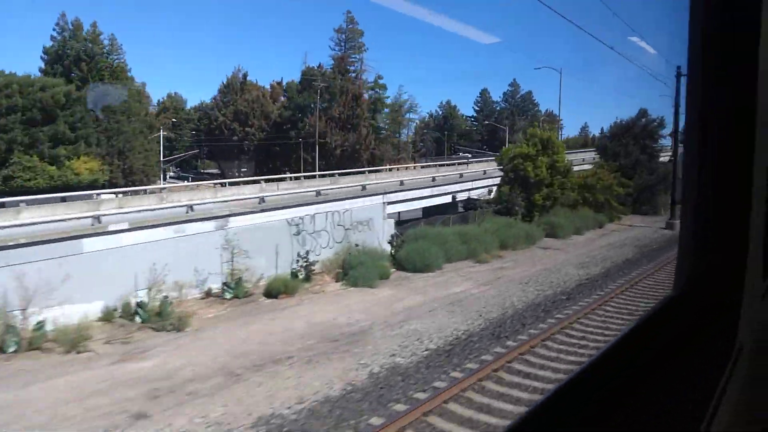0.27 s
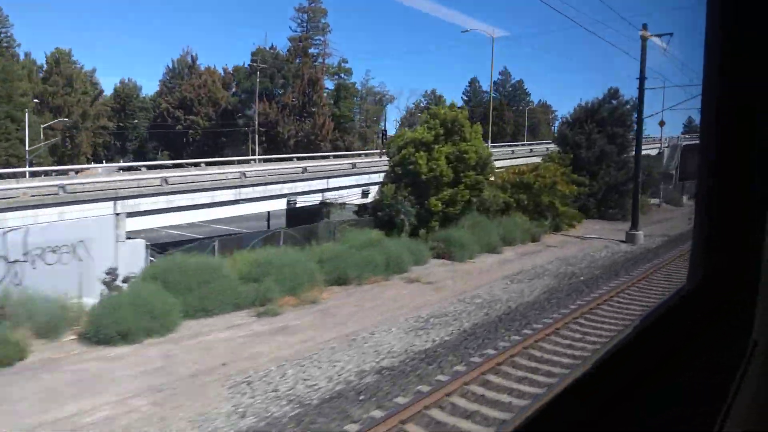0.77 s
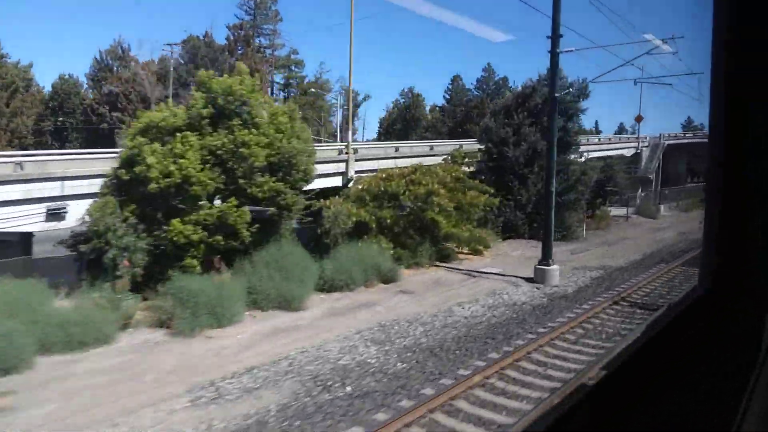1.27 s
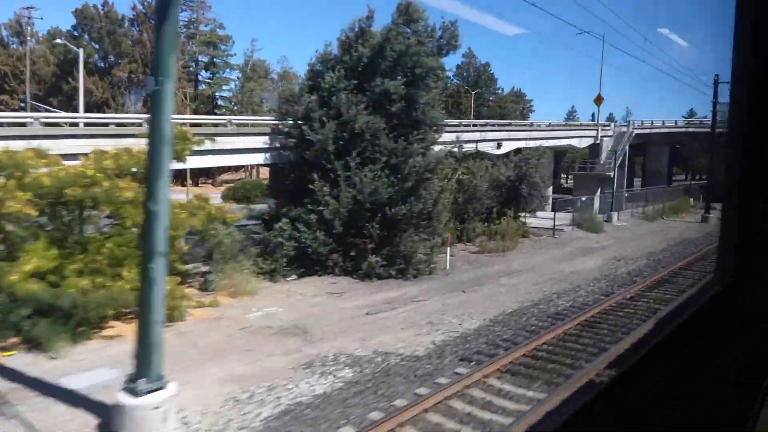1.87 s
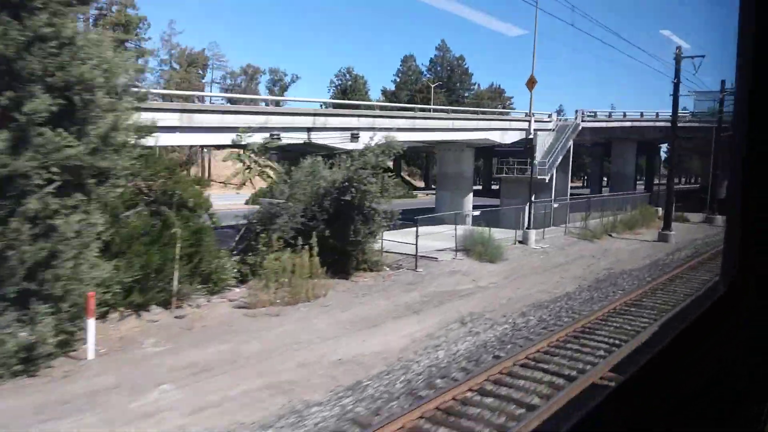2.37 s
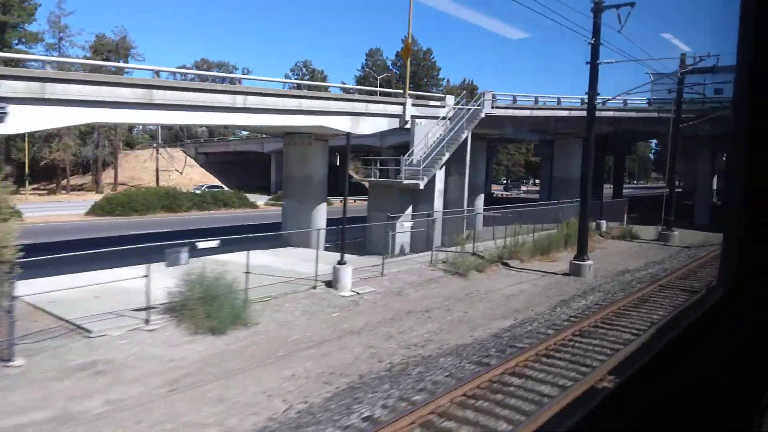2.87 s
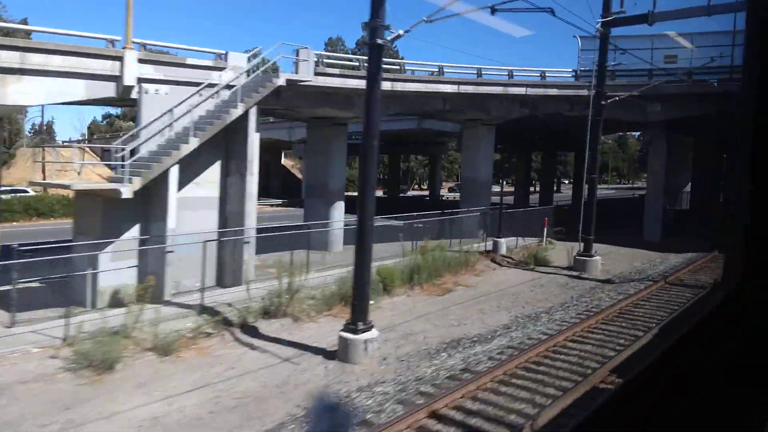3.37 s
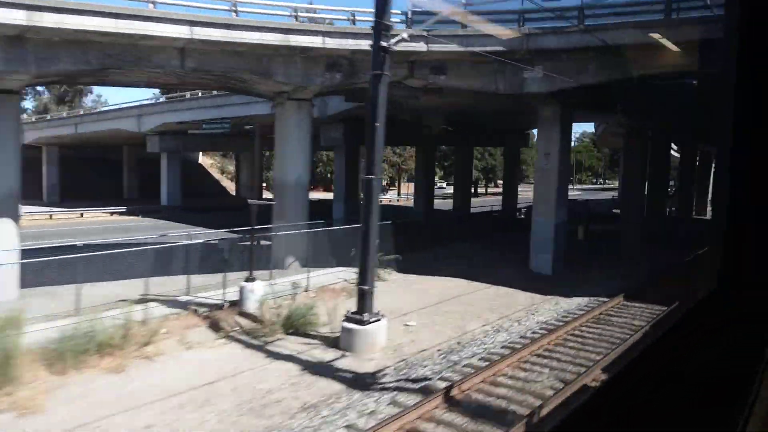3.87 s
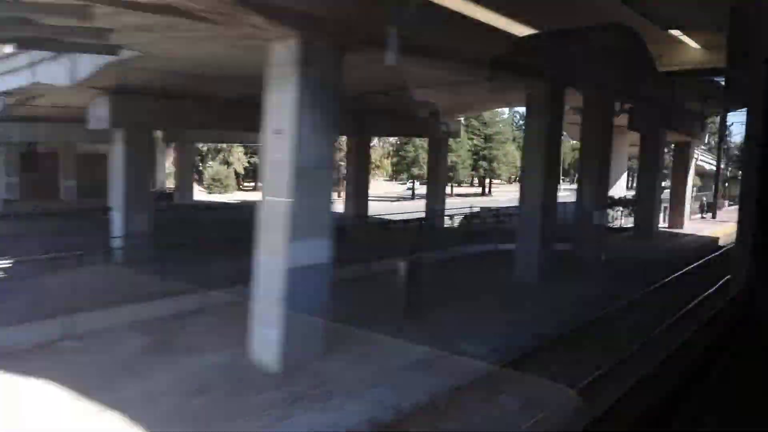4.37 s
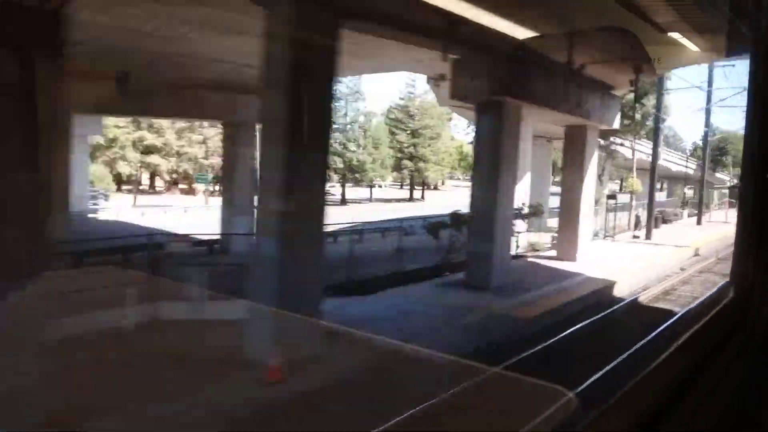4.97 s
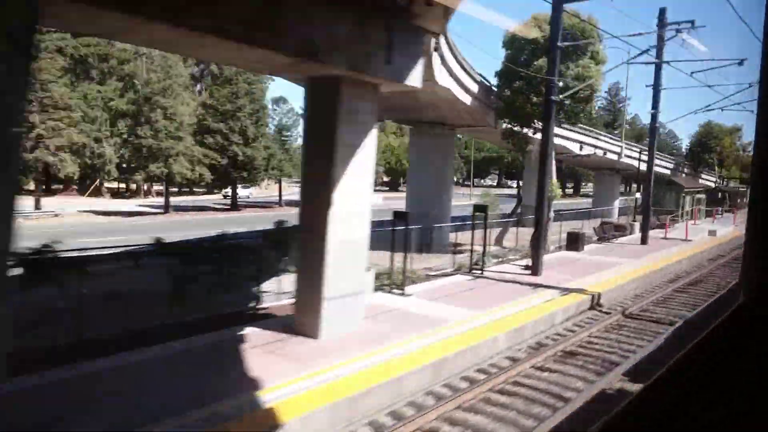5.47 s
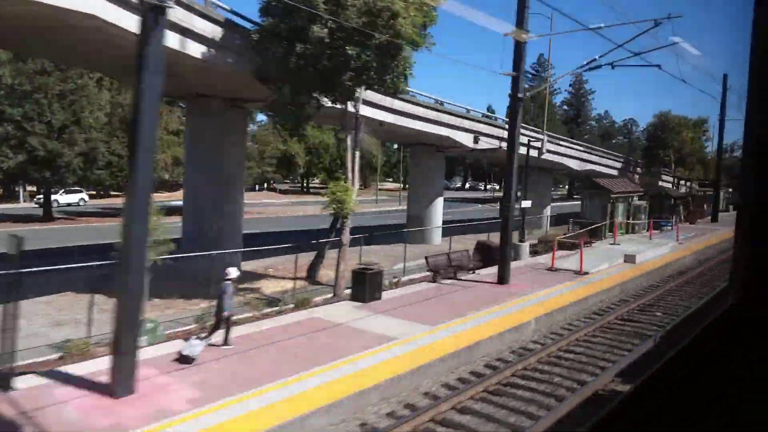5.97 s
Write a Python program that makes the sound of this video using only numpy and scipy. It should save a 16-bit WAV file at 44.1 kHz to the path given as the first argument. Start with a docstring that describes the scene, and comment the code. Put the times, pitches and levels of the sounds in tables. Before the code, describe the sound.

A stereo microphone in a closed train carriage picks up continuous bassy rolling, body thumps without sharp clacks, low hum and gentle air hiss. Faint high tones swell and fade unevenly, mostly toward the left. Around the middle come a few tiny dry ticks and light rustling, later one more soft tick. In the second half a low, hollow echo swells as the train passes under a bridge and along a platform.

```python
"""Inside an electric train by a window

Rough rail and dips in the track drive body, bogie and floor: bands of noise shaken into a deep rumble.
Diffuse noise gives the panel drone, the wheel roar and the echo that swells under a road bridge.
Vents hiss as shaped noise and fans hum as wandering sines; a power converter whines faintly as
high tones that waver at each side. Soft ticks and longer, faint rustles nearby are bursts of bright,
chattering noise."""
import sys
import numpy as np
from scipy import signal
from scipy.fft import rfft, irfft, next_fast_len
from scipy.io import wavfile
from scipy.ndimage import uniform_filter1d, map_coordinates

SR = 44100
rng = np.random.default_rng(int(sys.argv[2]) if len(sys.argv) > 2 else 0)


def put_to_file(sound):
    """Save the sound as 16-bit audio at rate SR, in the file named by the first command-line argument."""
    columns = np.atleast_2d(sound).T  # one column per channel
    safe = np.clip(columns, -1, 1)
    whole_steps = np.round(safe * 32767)
    wavfile.write(sys.argv[1], SR, whole_steps.astype(np.int16))


N = 274743  # samples


def amp(db):
    """Logarithmic level: decibels become an amplitude gain."""
    return 10 ** (np.asarray(db) / 20)


def unit(x):
    """Normalisation: scale the whole signal to rms 1."""
    return x / np.sqrt(np.mean(x ** 2) + 1e-20)


def along(points, hz):
    """Logarithmic interpolation: (frequency, value) points read on a log frequency axis."""
    point_hz, values = np.transpose(points)
    return np.interp(np.log(hz + 1), np.log(point_hz + 1), values)


def curves(rows):
    """Linear interpolation: one value per sample for each column after the time."""
    times, *columns = np.transpose(rows)
    return [np.interp(np.arange(N) / SR, times, column) for column in columns]


def wobble(rate):
    """Random modulation: a smooth curve through normal random knots, rate knots a second."""
    knots = rng.standard_normal(int(N * rate / SR) + 4)
    return map_coordinates(knots, [np.arange(N) * rate / SR])


def filtered(x, response):
    """Linear filtering: the spectrum of x times a response of frequency."""
    size = next_fast_len(N + SR // 2)
    spectrum = rfft(x, size) * response(np.fft.rfftfreq(size, 1 / SR))
    return irfft(spectrum, size)[..., :N]


def noise(response, channels=1):
    """Spectral shaping: white noise filtered so its amplitude per root Hz is the response."""
    return filtered(rng.standard_normal((channels, N)) * np.sqrt(SR / 2), response)


def resonance(hz, centre, width):
    """Damped oscillator: a complex bandpass response with gain 1 at its centre."""
    return 1j * hz * width / (centre ** 2 - hz ** 2 + 1j * hz * width)


def panned(lean_db):
    """Level difference between the sides: left and right gains of mean power 1."""
    gains = np.vstack([amp(lean_db / 2), amp(-lean_db / 2)])
    return gains / np.sqrt(np.mean(gains ** 2, axis=0))


def steadied(x, seconds):
    """Power levelling: rms 1 over each stretch of this length; the faster flutter stays."""
    power = uniform_filter1d(np.mean(x ** 2, axis=0), int(seconds * SR))
    return x / np.sqrt(np.abs(power) + 1e-20)


def tone(hz, wander_hz):
    """Frequency modulation: a sine of rms 1 whose pitch wanders at random."""
    cycles = np.cumsum(hz + wander_hz * wobble(10)) / SR + rng.random()
    return np.sqrt(2) * np.sin(2 * np.pi * cycles)


# dips in the track that jolt the car:
# (time [s], body sway level [dB], bogie throb level [dB], floor boom level [dB])
JOLTS = [(0.47, -27, -26.5, -36), (0.57, -23.5, -27, -42), (0.65, -15.5, -35, -31.5), (0.79, -40, -24, -44),
         (0.92, -30, -27, -28), (1.11, -29, -28, -41), (1.25, -32, -28.5, -29), (1.45, -34, -38, -28.5),
         (1.56, -23, -21.5, -41), (1.71, -20.5, -23, -27), (1.80, -40, -28.5, -32), (2.26, -18, -28, -29.5),
         (2.42, -12.5, -43, -39), (2.52, -18, -42, -31.5), (2.65, -20, -40, -31.5), (2.85, -26, -38, -27.5),
         (3.06, -16.5, -40, -42), (3.25, -22.5, -43, -47), (3.46, -21.5, -31, -43), (3.61, -18.5, -32, -44),
         (4.14, -16.5, -36, -40), (4.33, -17, -35, -40), (4.58, -16, -33, -41), (4.80, -24.5, -40, -48),
         (5.04, -24.5, -41, -41), (5.15, -26, -37, -38), (5.26, -24.5, -29, -42), (5.36, -19.5, -42, -46),
         (5.59, -19.5, -45, -42), (5.93, -29, -44, -50)]
JOLT_RISE_S, JOLT_T60_S = 0.034, 0.44  # every jolt builds up and dies away alike


def jolts():
    """Damped impulse response: envelopes of sway, throb and boom that swell quickly and ring out."""
    times, *levels_db = np.transpose(JOLTS)
    age = np.arange(N) / SR - times[:, None]
    rise = np.exp(-(np.minimum(age, 0) / JOLT_RISE_S) ** 2)
    decay = amp(-60 * np.maximum(age, 0) / JOLT_T60_S)
    return np.sqrt(amp(levels_db) ** 2 @ (rise * decay) ** 2)  # overlapping jolts add in power


# spectrum of the car body's slowest shaking: (frequency [Hz], relative density [dB per Hz])
BODY_SWAY = [(6, -16.5), (12, 1.5), (18, -1.5), (24, -11), (29, 2), (37, -5), (46, -7.5), (56, -20),
             (80, -36), (200, -120)]
# resonances of the floor and cabin air: (frequency [Hz], width [Hz], relative gain [dB])
FLOOR_MODES = [(73.7, 24, -5.5), (90.66, 3.6, 0), (110, 7.9, -4.5)]
# roughness of the track: (time [s], level [dB])
TRACK = [(0, 3.5), (0.75, 3.5), (1.4, 2.5), (1.78, 6), (1.97, -2), (2.22, 3.5), (2.55, -3.5), (2.8, -4.5),
         (2.95, -0.5), (3.45, -2), (3.75, -4.5), (4.5, 0), (6.23, -1.5)]
SWAY_DB, THROB_DB, BOOM_DB = -25.5, -33.5, -34.5  # levels on average track, between jolts
BOOM_FOLLOWS = 0.57  # the throb follows the roughness fully, the floor by this share (dB per dB)


def shaking():
    """Forced vibration: uneven track sways the body, throbs through the bogie and booms in the floor."""
    track_db, = curves(TRACK)
    heave, shudder, thud = jolts()
    sway = steadied(noise(lambda hz: amp(along(BODY_SWAY, hz))), seconds=0.139)
    # the running gear rings in one narrow band
    throb = steadied(noise(lambda hz: resonance(hz, 67.17, 11.1) ** 2), seconds=0.17)

    def floor(hz):
        """Modal superposition: resonances summed, then rolled off above 150 Hz."""
        modes = sum(amp(db) * resonance(hz, centre, width) for centre, width, db in FLOOR_MODES)
        return modes / (1 + (hz / 150) ** 6)

    boom = steadied(noise(floor), seconds=0.22)
    # the small part that differs between the sides: the sway spectrum moved up in frequency
    spread = unit(noise(lambda hz: amp(along(BODY_SWAY, hz / 1.66)), channels=2))
    # steady shaking and jolts add in power
    sway_gain = np.hypot(amp(SWAY_DB), heave)
    throb_gain = np.hypot(amp(THROB_DB + track_db + 0.91 * wobble(7)), shudder)
    boom_gain = np.hypot(amp(BOOM_DB + BOOM_FOLLOWS * track_db + 1.45 * wobble(10)), thud)
    return sway_gain * sway + throb_gain * throb + boom_gain * boom + amp(-46.5) * spread


# long waves reach both sides alike, short ones come from all around:
# (frequency [Hz], side minus mid [dB])
WIDTH = [(100, -30), (200, -24.5), (260, -12.5), (340, -8.5), (450, -3.5), (740, -5.5), (1200, 1)]
# lean of the rolling noise: (frequency [Hz], left minus right [dB])
LEAN = [(130, 1.5), (250, -2), (380, -1.5), (450, -4), (540, 7), (620, -8.5), (740, -0.5), (980, 0.5),
        (1400, -0.5)]


def diffuse(response):
    """Diffuse field: stereo noise of rms 1 whose low frequencies are nearly alike at both sides."""
    mid, side = noise(lambda hz: response(hz) * panned(-along(WIDTH, hz)), channels=2)
    sides = np.array([mid + side, mid - side])
    return unit(filtered(sides, lambda hz: panned(along(LEAN, hz))))


# drone of the wall panels: (frequency [Hz], relative density [dB per Hz])
DRONE = [(40, -45), (100, -4), (132, 0.5), (160, 0), (185, 2.5), (255, -2), (300, -3.5), (350, -7.5),
         (400, -22.5), (900, -67), (2000, -120)]
# level of that drone before its slight waver: (time [s], level [dB])
WALLS = [(0, -35), (1.25, -35), (1.5, -32.5), (2.1, -36.5), (2.45, -33), (2.68, -38), (3.2, -34),
         (3.7, -36), (4.4, -35), (6.23, -34)]
# wheel roar heard through the floor: (frequency [Hz], relative density [dB per Hz])
ROAR = [(200, -36), (390, 1.5), (450, 1.5), (620, 0), (800, -6), (1080, -4), (1200, -8), (1600, -17),
        (4000, -69), (9000, -120)]
# panels that ring in that roar: (frequency [Hz], width [Hz], peak lift [dB])
PANELS = [(529, 18, 4.5), (697, 37, 4), (860, 5.9, 8.5), (960, 9.8, 3.5)]
# a road bridge and platform throw the wheel noise back at the car; before its slight waver:
# (time [s], level [dB])
BRIDGE = [(0, -66), (3.0, -64), (3.6, -44), (4.5, -43.5), (4.8, -40.5), (5.3, -38), (5.9, -38.5),
          (6.23, -52)]
# colour of that echo: (frequency [Hz], relative density [dB per Hz])
ECHO = [(80, -46), (170, -19), (225, 2.5), (260, 3), (330, -3), (420, -8.5), (560, -12), (720, -14.5),
        (1100, -24.5), (1600, -30.5), (3500, -63), (8000, -120)]
EVEN_S, EVEN_WAVER_DB = .4, .6  # drone and echo are levelled over this stretch, then waver a little


def rolling():
    """Structure-borne sound: rail roughness drones in the panels and roars; the bridge adds its echo."""
    def even(x):
        """Levelling followed by slight random modulation."""
        return steadied(x, EVEN_S) * amp(EVEN_WAVER_DB * wobble(8))

    def ringing_db(hz):
        """Resonant lift of the panels."""
        return sum(db * np.abs(resonance(hz, centre, width)) ** 2 for centre, width, db in PANELS)

    walls_db, = curves(WALLS)
    bridge_db, = curves(BRIDGE)
    drone = even(diffuse(lambda hz: amp(along(DRONE, hz))))
    roar = diffuse(lambda hz: amp(along(ROAR, hz) + ringing_db(hz)))
    echo = even(diffuse(lambda hz: amp(along(ECHO, hz))))
    roar_gain = amp(-45.5 + 0.39 * wobble(2.78))
    return amp(walls_db) * drone + roar_gain * roar + amp(bridge_db) * echo


# air from the vents at each ear of the microphone: (frequency [Hz], density [dB per Hz])
AIR_LEFT = [(200, -90.5), (950, -78), (1300, -85.5), (2350, -80.5), (3000, -86), (3900, -86.5),
            (4550, -84.5), (5600, -94.5), (7400, -93.5), (8100, -99), (8800, -107), (10300, -121),
            (15500, -128)]
AIR_RIGHT = [(200, -97), (750, -78), (1100, -88), (1500, -84.5), (1750, -86), (2300, -83), (2750, -90),
             (3900, -89.5), (5000, -95), (6500, -103), (8700, -108), (10500, -105), (12000, -113),
             (13000, -122), (15500, -128)]
# fans and pumps, level before duty and waver:
# (frequency [Hz], level [dB rms], left minus right [dB], pitch wander [Hz])
HUM = [(119, -46, 0, 3), (185, -50, -1, 2), (277.8, -44.3, -3.5, 3), (547, -63, 0, 3), (562, -63, 0, 6),
       (1094, -68, 0, 2)]
# how strongly the fans and pumps come through: (time [s], gain [dB])
DUTY = [(0, -0.5), (3, -2.5), (4.2, 0.5), (5.2, 0), (6.2, 0)]


def ventilation():
    """Flow noise and rotating machinery: vents hiss broadly while fans and pumps hum unsteadily."""
    air = noise(lambda hz: amp([along(AIR_LEFT, hz), along(AIR_RIGHT, hz)]), channels=2)
    air = air * amp(0.089 * wobble(0.98) + 0.37 * wobble(10))
    duty_db, = curves(DUTY)
    hum = np.zeros((2, N))
    for hz, db, lean, wander in HUM:
        gain = amp(db + 2.4 * wobble(2.41))
        hum += panned(lean) * gain * tone(hz, wander)
    return air + amp(duty_db) * hum


# the converter's strong switching tones, level between swells and before waver:
# (frequency [Hz], level [dB rms], left minus right [dB])
STRONG = [(3718.7, -69, 1), (3838.6, -72, 8), (3958.6, -69, 3), (4078.5, -66.7, 1), (4198.3, -70, 9),
          (7676.8, -79, 13), (8277, -82.5, 4), (10060.3, -86, -20)]
# its weaker sidebands, likewise: (frequency [Hz], level [dB rms], left minus right [dB])
SIDEBANDS = [(2657, -76, 11), (2931, -76, 12), (3599, -74.5, 10), (3779, -77, 6), (4438, -73.5, 11),
             (4559, -75, 13), (7557, -76, 17), (7797, -81, 12), (7811, -82.5, 10), (8037, -85.5, 18),
             (8157, -80.5, 8), (8788, -88, -4), (9820, -88.5, -16), (9940, -90.5, -14), (10742, -92, -20)]
# now and then a tone swells, holds and fades as the cabin's standing waves shift; before waver:
# (time [s], tone frequency [Hz], level [dB rms], half length [s], left minus right [dB])
SWELLS = [(0.08, 8277, -74.5, .18, 11), (0.17, 3838.6, -54.7, .34, 13), (0.2, 4198.3, -63, .24, 10),
          (0.22, 7797, -76, .2, 14), (0.22, 10742, -83, .3, -20), (0.48, 3718.7, -62, .17, 8),
          (0.25, 4078.5, -67, .3, 2), (0.55, 3958.6, -66.5, .7, 5), (0.7, 3838.6, -60.7, .25, 13),
          (0.7, 8277, -80, .45, 5), (0.85, 4078.5, -66.5, .4, 12), (1.0, 3718.7, -64.5, .25, 6),
          (1.05, 10742, -86, .25, -20), (1.12, 3838.6, -54.5, .2, 20), (1.22, 4198.3, -64, .13, 12),
          (1.55, 3838.6, -64.5, .13, 10), (1.5, 10060.3, -78.5, .2, -20), (1.55, 4198.3, -66, .2, 8),
          (1.96, 4198.3, -60.2, .27, 18), (2.07, 3838.6, -62.5, .2, 14), (2.25, 3958.6, -63, .2, 12),
          (2.3, 10060.3, -80, .25, -20), (2.53, 4078.5, -64.5, .14, 2), (2.75, 3958.6, -66.5, .3, 10),
          (2.9, 7676.8, -73, .62, 17), (2.98, 10060.3, -76.2, .43, -20), (2.98, 4198.3, -64.5, .18, 12),
          (3.0, 3838.6, -65.5, .3, 3), (3.25, 3718.7, -65, .28, 0), (3.55, 3838.6, -64, .15, 10),
          (3.55, 4198.3, -66.5, .2, 12), (3.65, 3958.6, -63.2, .16, 12), (3.72, 4078.5, -59.3, .18, 20),
          (3.88, 3838.6, -60.2, .17, 12), (3.98, 10060.3, -76, .5, -20), (4.28, 4078.5, -64.5, .15, 14),
          (4.6, 3718.7, -65.5, .6, 5), (4.6, 7676.8, -71.2, .42, 13), (4.7, 4198.3, -66, .13, 12),
          (4.8, 10060.3, -78, .45, -20), (4.85, 4078.5, -63.2, .3, 12), (4.97, 3838.6, -65, .12, 2),
          (5.2, 3599, -73, 1.1, 10), (5.37, 3838.6, -62, .19, 5), (5.65, 7676.8, -71.2, .42, 12),
          (6.02, 3838.6, -63.5, .17, 3), (6.08, 4198.3, -65, .1, 12)]
STRONG_WAVER_DB, SIDEBAND_WAVER_DB = 1.2, 2.1  # depth of the random waver
SIDE_PHASE = 1.6  # phase between the two sides in the cabin's standing waves (radians)


def converter():
    """Standing waves: steady switching tones swell and waver at each side in their own way."""
    t = np.arange(N) / SR

    def at_ears(hz, waver_db):
        """Interference: one tone with its own waver in level and phase at each side."""
        phase = 2 * np.pi * (hz * t + rng.random())
        sides = []
        for offset in (0, SIDE_PHASE):
            waver = amp(waver_db * wobble(2.5))
            sides.append(waver * np.sin(phase + offset + .35 * wobble(3)))
        return np.sqrt(2) * np.array(sides)

    def level(hz, rest_db, rest_lean):
        """Power addition: the resting level and the flat-topped swells of this tone."""
        power = (amp(rest_db) * panned(rest_lean)) ** 2
        for s, tone_hz, db, half, lean in SWELLS:
            if tone_hz == hz:
                plateau = np.exp(-((t - s) / half) ** 4)
                power = power + (amp(db) * panned(lean) * plateau) ** 2
        return np.sqrt(power)

    strong = sum(level(hz, db, lean) * at_ears(hz, STRONG_WAVER_DB) for hz, db, lean in STRONG)
    weak = sum(level(hz, db, lean) * at_ears(hz, SIDEBAND_WAVER_DB) for hz, db, lean in SIDEBANDS)
    return strong + weak


# soft ticks and longer, faint rustles nearby, level before the envelope,
# width of one of three equal filter stages:
# (time [s], level [dB], centre [Hz], width [Hz], 60 dB decay [s], left minus right [dB])
TICKS_AND_RUSTLES = [(2.31, -65, 6500, 3000, 2.4, 0), (2.455, -58.5, 7600, 6000, .22, -2),
                     (2.625, -59.3, 7600, 6000, .18, -2), (2.65, -56, 6900, 5200, .2, -1),
                     (3.46, -65, 6600, 2500, 1.2, 0), (4.138, -56.8, 6700, 1900, .28, 2)]
CHATTER_DB, CHATTER_RATE = 3, 160  # depth, random knots a second
BURST_TOP_HZ = 11500  # each burst is dull above this


def ticks_and_rustles():
    """Transient contact: bright, chattering noise that rises quickly and decays, fast or slowly."""
    def ports_db(hz):
        """Receiver response: the two microphone ports colour the treble unlike."""
        return along(AIR_LEFT, hz) - along(AIR_RIGHT, hz)

    out = np.zeros((2, N))
    for s, db, centre_hz, width_hz, t60, lean in TICKS_AND_RUSTLES:
        age = np.maximum(np.arange(N) / SR - s, 0)
        colour = lambda hz: resonance(hz, centre_hz, width_hz) ** 3 / (1 + (hz / BURST_TOP_HZ) ** 10)
        scuff = noise(lambda hz: panned(ports_db(hz) + lean) * colour(hz), channels=2)
        chatter = unit(scuff * amp(CHATTER_DB * wobble(CHATTER_RATE)))
        rise = 1 - np.exp(-age / .008)
        out += amp(db - 60 * age / t60) * rise * chatter
    return out


def scene():
    """Superposition: everything heard from the window seat."""
    return shaking() + rolling() + ventilation() + converter() + ticks_and_rustles()


TOP_HZ = 15700  # band limit


def record(dry):
    """Band limitation: both ends fade briefly and nothing from the band limit upward is kept."""
    fade = signal.windows.tukey(N, .002)
    return filtered(dry * fade, lambda hz: hz < TOP_HZ)


dry = scene()
out = record(dry)
put_to_file(out)
```